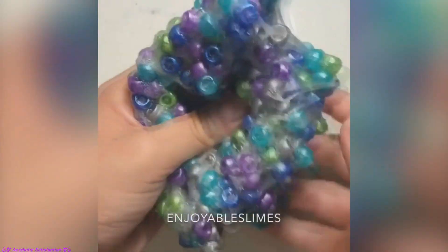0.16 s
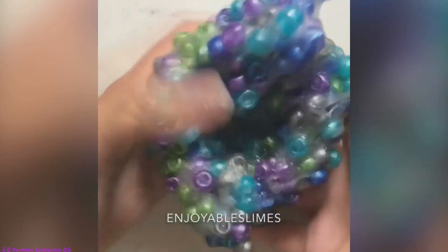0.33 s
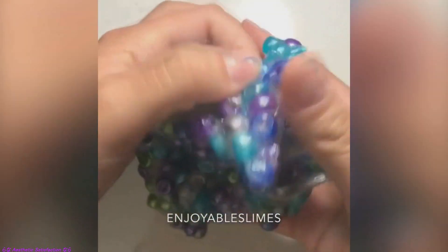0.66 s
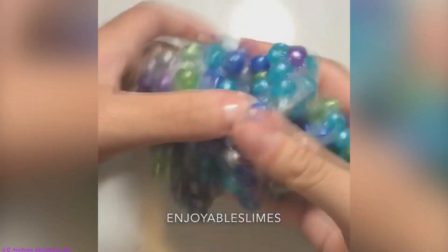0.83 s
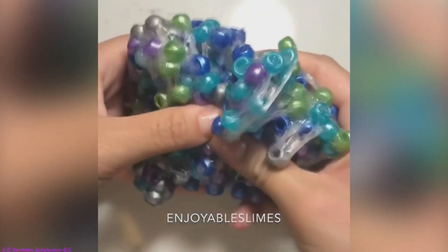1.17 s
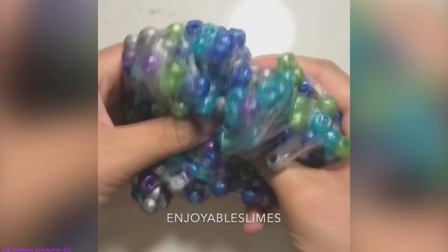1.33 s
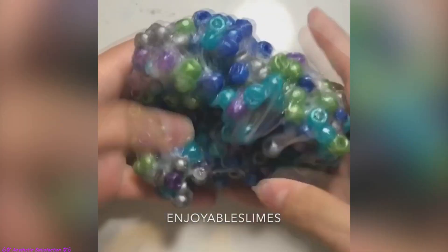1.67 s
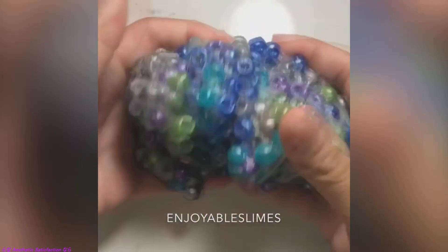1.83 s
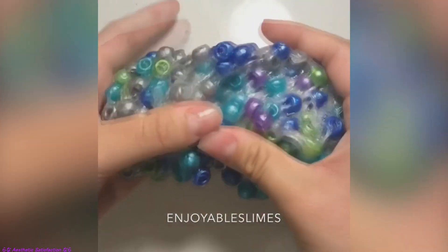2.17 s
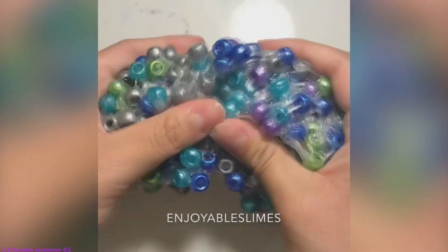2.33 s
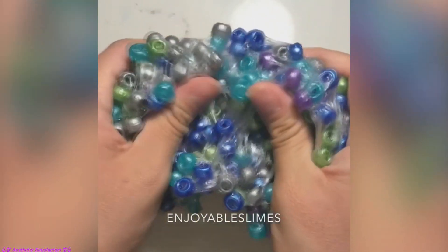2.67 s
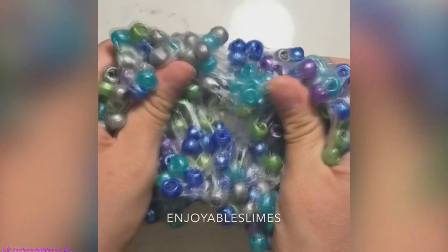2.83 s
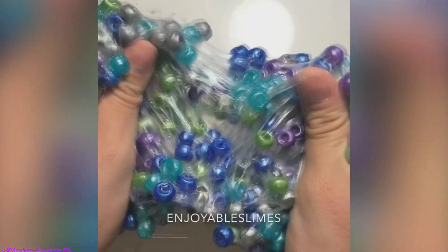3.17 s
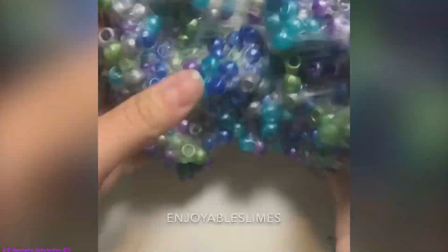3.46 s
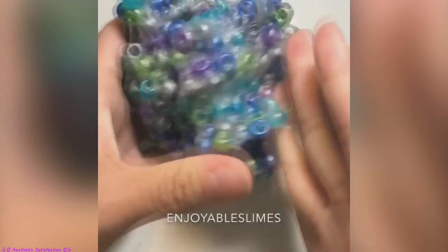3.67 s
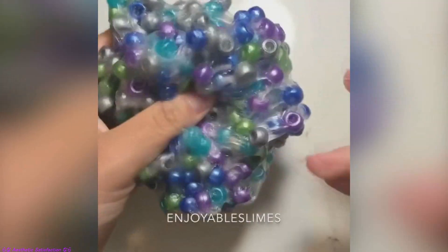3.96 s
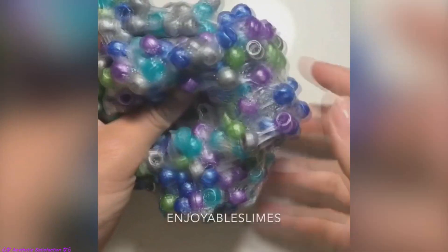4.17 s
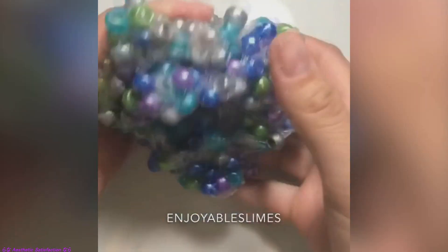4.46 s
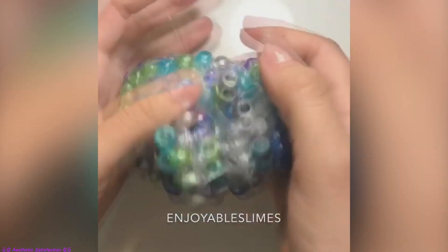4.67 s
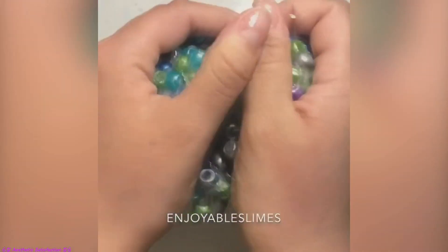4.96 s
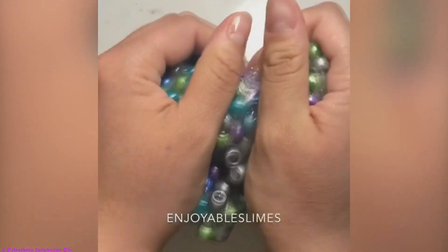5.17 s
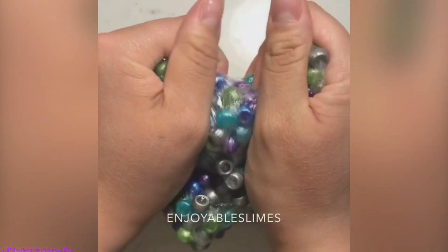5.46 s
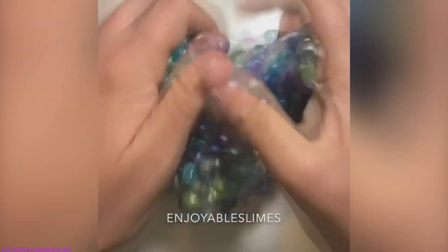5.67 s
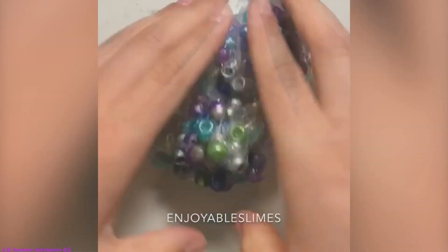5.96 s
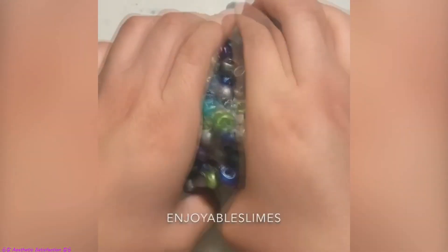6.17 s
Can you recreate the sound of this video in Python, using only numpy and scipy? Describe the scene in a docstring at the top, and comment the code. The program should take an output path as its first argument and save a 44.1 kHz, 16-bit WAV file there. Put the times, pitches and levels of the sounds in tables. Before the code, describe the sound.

Bead-filled slime crackles and pops in squeeze after squeeze, close up, with short swishes as it peels off the palms.

```python
"""Two hands knead clear slime full of plastic beads, close by in a quiet room with a low hum.
From the first squeeze, tiny sticky ruptures crackle and trapped air bursts in sharp pops.
Squeeze follows squeeze, and now and then the slime swishes as it peels off the palms.
The hardest squeeze comes at about 5.5 s; after one last peel the slime settles."""
import sys
import numpy as np
from scipy import signal
from scipy.fft import rfft, irfft, next_fast_len
from scipy.io import wavfile
from scipy.ndimage import uniform_filter1d

SR = 44100
rng = np.random.default_rng(int(sys.argv[2]) if len(sys.argv) > 2 else 0)


def wav_out(sig):
    """Save sig, one row per channel (or a flat mono array), as 16-bit PCM at SR to the path in sys.argv[1]."""
    wavfile.write(sys.argv[1], SR, np.round(np.clip(np.atleast_2d(sig).T, -1, 1) * 32767).astype(np.int16))


N = 277815

ORDINARY_DB = -48.5  # crackle drive at ordinary effort


def from_db(db):
    """Amplitude ratio: tenfold for every 20 dB."""
    return 10 ** (np.asarray(db) / 20)


def rms_one(x):
    """Normalisation to unit mean power."""
    return x / np.sqrt(np.mean(x ** 2) + 1e-20)


def level_at(spectrum, hz):
    """Interpolation of level on a logarithmic frequency axis."""
    f, db = np.transpose(spectrum)
    return np.interp(np.log(np.maximum(hz, 1)), np.log(f), db)


def coloured(x, spectrum):
    """Spectral shaping of a steady sound, at unit rms."""
    size = next_fast_len(N)
    hz = np.arange(size // 2 + 1) * SR / size
    return rms_one(irfft(rfft(x, size) * from_db(level_at(spectrum, hz)), size)[:N])


def drift(per_s):
    """Continuous random modulation of unit variance."""
    steps = rng.standard_normal(8192)
    return np.interp(np.arange(N) / SR * per_s, np.arange(len(steps)), steps) * np.sqrt(3 / 2)


def resonate(x, hz, q):
    """Two damped resonators in series: the response swells and dies within a few cycles."""
    hz = min(hz, SR / 3)
    b, a = signal.iirpeak(hz, max(q, 3 * hz / SR), fs=SR)
    return signal.lfilter(b, a, signal.lfilter(b, a, x + 1e-18))


def evened(x, window_s):
    """Running normalisation holds the short-term rms near 1."""
    power = x ** 2
    for _ in range(2):
        power = uniform_filter1d(power, max(int(window_s * SR), 2))
    return x / np.sqrt(np.abs(power) + 1e-12)


def background(hiss_db=-60, rumble_db=-51, hum_db=-53, hum_hz=57):
    """Broadband hiss and low rumble lie under a hum modulated in frequency and amplitude."""
    # noise spectra: f/Hz, relative level/dB
    hiss_spectrum = [(60, -43), (140, 4), (250, -4.5), (450, -8), (650, -8), (1900, -16), (5300, -14.5),
                     (13000, -19.5), (16000, -39)]
    rumble_spectrum = [(23, -57), (33, -0.5), (43, -43), (54, 2), (69, -0.5), (88, -16), (106, -11),
                       (130, -29), (200, -31)]
    hiss = coloured(rng.standard_normal(N), hiss_spectrum)
    rumble = coloured(rng.standard_normal(N), rumble_spectrum + [(1000, -120)])
    phase = 2 * np.pi * np.cumsum(hum_hz + 1.3 * drift(2.686)) / SR
    hum = from_db(hum_db - 0.5 * drift(7.3)) * np.sqrt(2) * np.sin(phase)
    return from_db(hiss_db) * hiss + from_db(rumble_db) * evened(rumble, window_s=0.26) + hum


def room(x, t60_s=0.17, tail_db=-21, dull_hz=7000, build_up_s=0.0027):
    """Convolution adds early reflections, sympathetic resonances and a short diffuse tail."""
    # reflections off hard surfaces around the hands: delay t/s, level/dB
    echoes = [(.0014, -26), (.0031, -48), (.0272, -55), (0.0354, -27)]
    # modes of hard things nearby: f/Hz, bandwidth/Hz, level/dB
    modes = [(1351, 28, -2), (2000, 56, -6), (3920, 28, -3.5), (5440, 100, -7), (6440, 14, -20),
             (9200, 10, -10), (8880, 146, -3.5)]
    t = np.arange(SR // 2) / SR
    tail = rng.standard_normal(len(t)) * from_db(-60 * t / t60_s) * (1 - np.exp(-t / build_up_s))
    tail = signal.sosfilt(signal.butter(1, dull_hz, fs=SR, output="sos"), tail)
    response = from_db(tail_db) * tail / np.linalg.norm(tail)
    for delay, db in echoes:
        response[int(delay * SR)] += from_db(db)
    for hz, width, db in modes:
        decay = 2 * np.pi * width / SR * np.exp(-np.pi * width * t)
        response += from_db(db) * decay * np.cos(2 * np.pi * hz * t)
    return x + signal.fftconvolve(x, response)[:N]


def ruptures(per_s, spread_db, clump_db, clumps_per_s=170):
    """Sticky threads break as a Poisson process: most faintly, the strong ones in clumps."""
    breaks = rng.random(N) < per_s / SR
    size_db = spread_db * np.minimum(rng.exponential(1, N), 4)
    size_db += clump_db * np.clip(drift(clumps_per_s), -2, 2)
    return breaks * from_db(size_db) * rng.choice([-1, 1], N)


def peeling(gain_db=-1, edge_db=-17, fade_s=0.021):
    """Shot noise: ruptures off the skin merge into a swish that follows the speed of the peel."""
    # spectrum of the swish: f/Hz, relative level/dB
    spectrum = [(150, -13.5), (400, -15.5), (700, -7.5), (1350, -7), (2400, -4.5), (5200, -7), (7500, -8.5),
                (9500, -10.5), (13000, -13.5), (16000, -10)]
    # peels, coloured by the gap under the hand: start t/s, fastest t/s, end t/s,
    # top level/dB before gain_db, ring f/Hz, ring level/dB re the swish, low-pass f/Hz
    peels = [(0.388, 0.415, .53, -39.5, 5100, -59, 12000), (1.041, 1.05, 1.11, -42, 8800, 0, 14000),
             (1.742, 1.761, 1.84, -32, 960, -13.5, 11500), (3.465, 3.502, 3.72, -30, 5800, -16, 15100),
             (4.455, 4.486, 4.502, -24.5, 5700, -10.5, 8330),
             (5.772, 5.827, 5.925, -27.5, 1340, -19, 14000)]
    swish = coloured(ruptures(per_s=14000, spread_db=5, clump_db=3.5), spectrum)
    out = np.zeros(N)
    for start, fastest, end, db, ring_hz, ring_db, muffle_hz in peels:
        span = np.arange(int((start - fade_s) * SR), int((end + fade_s) * SR))
        speed_db = np.interp(span / SR, [start, fastest, end], [edge_db, 0, edge_db])
        contact = np.interp(span / SR, [start - fade_s, start, end, end + fade_s], [0, 1, 1, 0]) ** 2
        ring = from_db(ring_db) * rms_one(resonate(swish[span], ring_hz, q=1.16))
        muffled = signal.sosfilt(signal.butter(3, muffle_hz, fs=SR, output="sos"), swish[span] + ring)
        out[span] += from_db(db + speed_db + gain_db) * contact * muffled
    return out


def kneading(grip_db_per_s=595, relax_db_per_s=143, rest_crisp_db=-61., rest_wet_db=-62.):
    """Loading and relaxation: the crisp and wet drives, in dB, rise fast and fall more slowly."""
    # squeezes: grip t/s, release t/s, crisp drive at release/dB, growth in the grip/dB, wet re crisp/dB
    squeezes = [(-.02, 0.244, -47.5, 0, -2), (0.797, 1.112, -52, 5.5, -3.5), (1.163, 1.207, -49.5, 3, -0.5),
                (1.247, 1.6, -42.5, 2, 1.5), (1.73, 1.84, -53.5, 9, 1.5), (2.027, 2.326, -48.5, 3, -3.5),
                (2.412, 2.773, -42.5, 2, -1.5), (2.792, 3.113, -41.5, 4.5, 0.5), (3.17, 3.36, -52, -8, -3),
                (3.436, 3.88, -50.5, 1, -3), (3.98, 4.1, -53.5, 2, -2), (4.114, 4.275, -44, 1, -2.5),
                (4.635, 4.781, -50, 0, -1), (4.928, 4.952, -50, 2, -1.5), (5.024, 5.23, -40, 8.5, -1.5),
                (5.258, 5.593, -31.5, 2.5, -5.5), (5.702, 5.808, -45.5, 2.5, -4.5)]
    t = np.arange(N) / SR
    crisp, wet = np.full(N, rest_crisp_db), np.full(N, rest_wet_db)
    for grip, release, db, growth_db, wet_db in squeezes:
        level = np.interp(t, [grip, release], [db - growth_db, db])
        level -= grip_db_per_s * np.maximum(grip - t, 0)
        level -= relax_db_per_s * np.maximum(t - release, 0)
        crisp, wet = np.maximum(crisp, level), np.maximum(wet, level + wet_db)
    return crisp, wet


def pockets(clicks, spectrum, q, variety_db, jostle_db, count, jostle_t60_s=0.014):
    """Impulse excitation: each rupture rings one of many pocket sizes and briefly jostles the beads."""
    pitches = np.geomspace(spectrum[0][0], spectrum[-1][0], count)
    pocket_hit = rng.integers(0, count, N)
    clicks = clicks * from_db(variety_db * np.clip(rng.standard_normal(N), -2, 2))
    fade = np.exp(-2 * np.log(1000) / (jostle_t60_s * SR))
    jostle_power = from_db(jostle_db) ** 2 * (1 - fade)
    noise, out = rng.standard_normal(N), 0
    for k, hz in enumerate(pitches):
        hits = clicks * (pocket_hit == k)
        jostle = noise * np.sqrt(signal.lfilter([jostle_power], [1, -fade], hits ** 2 + 1e-18))
        out += from_db(level_at(spectrum, hz)) / np.sqrt(hz) * resonate(hits + jostle, hz, q)
    return out


def crackle(crisp_db, wet_db, wet_gain_db=-0.65, crisp_gain_db=-1.5):
    """Acoustic emission: more stress breaks more threads, each with a wet low and a crisp high tick."""
    # spectra of the ticks: f/Hz, relative level/dB
    wet_spectrum = [(160, -17), (330, -10), (500, -20.5), (700, -1.5), (1000, 2.5), (1400, 5), (1900, 2.5),
                    (2700, 6.5)]
    crisp_spectrum = [(3100, -0.5), (4200, 3), (5500, 7), (7200, -0.5), (9000, -5), (13300, -2.5)]
    effort = from_db(0.2 * (crisp_db - ORDINARY_DB))
    clicks = ruptures(per_s=3200 * effort, spread_db=3, clump_db=4.5, clumps_per_s=240)
    wet = pockets(clicks, wet_spectrum, q=2.06, variety_db=1, jostle_db=-2, count=18)
    crisp = pockets(clicks, crisp_spectrum, q=2.3, variety_db=7, jostle_db=-2.5, count=12)
    return (from_db(wet_db + wet_gain_db) * evened(wet, window_s=0.06)
            + from_db(crisp_db + crisp_gain_db) * evened(crisp, window_s=0.023))


def pops(bursts, cavity_q=1.13, jostle_s=0.0017, size=1024):
    """Cavity resonance: a film snaps, the pocket behind it rings lower, and the beads around jostle."""
    out, t = np.zeros(N + size), np.arange(size) / SR
    click = 1. * (t == 0)
    for start, snap_db, snap_hz, snap_q, cavity_db, cavity_hz in bursts:
        at = int(start * SR)
        # a bigger pocket snaps lower and shifts more beads: 4 dB more per octave down
        jostle_db = -3 + 4 * np.log2(4670 / snap_hz)
        for db, hz, q in (snap_db, snap_hz, snap_q), (cavity_db, cavity_hz, cavity_q):
            ring = resonate(click, hz, q)
            jostle = resonate(rng.standard_normal(size) * np.exp(-t / jostle_s), hz, q)
            jostle *= from_db(jostle_db) * np.linalg.norm(ring) / np.linalg.norm(jostle)
            out[at:at + size] += from_db(db) * (ring + jostle) / np.abs(ring).max()
    return out[:N]


def small_pops(crisp_db, ordinary_per_s=45, snap_hz=7800, snap_q=1, cavity_hz=1350, spread_octaves=0.47):
    """Lesser pockets burst as a Poisson process whose rate and level rise with the squeeze."""
    effort_db = crisp_db - ORDINARY_DB
    per_s = ordinary_per_s * from_db(0.55 * effort_db)
    onsets = np.flatnonzero(rng.random(N) < per_s / SR)
    bursts = []
    for at in onsets:
        strength, pitch, cavity_pitch = np.clip(rng.standard_normal(3), -2, 2)
        snap_db = -31 + 0.65 * effort_db[at] + 3 * strength
        bursts.append((at / SR, snap_db, snap_hz * 2 ** (spread_octaves * pitch), snap_q,
                       snap_db - 13, cavity_hz * 2 ** (spread_octaves * cavity_pitch)))
    return pops(bursts)


def loud_pops():
    """Sudden pressure release: the main pockets of trapped air burst at set times."""
    # bursts: t/s, snap peak level/dB, snap f/Hz, snap Q, cavity peak level/dB, cavity f/Hz
    bursts = [(.0616, -20.5, 5500, 3.5, -44, 850), (.0764, -24, 5960, 1.9, -14.5, 2580),
              (.103, -20.5, 7200, 0.7, -31, 1510), (.121, -16.5, 5240, 1.9, -37.5, 940),
              (.2248, -16, 4200, .8, -38, 1260), (.4774, -30, 8100, 2.7, -25, 2600),
              (.7864, -26, 5360, .8, -41.5, 1190), (.8436, -24, 4200, .5, -58, 1450),
              (.8707, -32, 3630, 2.2, -48, 1410), (.9085, -23.5, 5400, .5, -53, 1700),
              (1.0352, -19.5, 2270, 1.9, -41, 1130), (1.2515, -13.5, 5000, 2.1, -17, 1340),
              (1.2762, -12, 7640, 1, -41, 1350), (1.311, -10.5, 2690, 1.1, -19, 1150),
              (1.3137, -13, 4730, 2.7, -10, 2010), (1.3705, -17.5, 7200, 2.3, -52, 1350),
              (1.3795, -23.5, 6370, 5.6, -43.5, 2150), (1.425, -13, 3570, 1, -23.5, 1100),
              (1.5145, -12.5, 4540, 1.1, -24, 1050), (1.5962, -11.5, 6200, 4.3, -20, 1690),
              (1.6114, -13.5, 5100, 1.5, -45, 1250), (1.6258, -11, 4560, 1.4, -20.5, 2590),
              (1.7245, -24.5, 5900, 1.3, -58, 1300), (1.7616, -27, 4230, .5, -32, 700),
              (1.958, -9, 4870, 1.9, -39, 920), (2.0309, -5.5, 6600, 2, -16.5, 2550),
              (2.125, -21, 8420, 1, -31.5, 1110), (2.2775, -21, 8100, 1.1, -50, 1500),
              (2.3077, -19, 2940, .4, -38.5, 1010), (2.403, -18, 3370, .9, -30, 970),
              (2.4583, -19.5, 3940, 0.6, -38, 820), (2.5175, -10, 4900, 1, -29, 1730),
              (2.5663, -19.5, 3520, .7, -25.5, 1141), (2.5917, -2, 6040, .8, -44, 1000),
              (2.6099, -8, 5770, 3, -43, 700), (2.7354, -14.5, 4500, .8, -28.5, 1160),
              (2.8986, -22, 2400, .9, -35, 1410), (2.9735, -6.5, 7560, .85, -30, 1290),
              (2.9819, -18.5, 5300, 2, -23.5, 2800), (3.0059, -23, 4540, 2.4, -18, 1350),
              (3.0199, -18.5, 5470, 2.8, -19.5, 1350), (3.0395, -14.5, 4530, 1.2, -33.5, 780),
              (3.0767, -9.5, 5470, 1, -24, 1170), (3.1296, -11, 4360, 1.3, -25, 1290),
              (3.136, -8.5, 4700, 1.6, -33, 1020), (3.1706, -22.5, 5340, 3.3, -44, 2780),
              (3.214, -5, 12500, 1.2, -27.5, 1130), (3.263, -19.5, 6640, .6, -53, 1400),
              (3.373, -26.5, 9050, 1.3, -48, 1900), (3.522, -13, 5440, 2.3, -21.5, 1690),
              (3.5294, -3.5, 5100, 1.2, -21.5, 1520), (3.566, -25, 2780, 2.7, -23, 1660),
              (3.653, -8, 6540, .7, -37.5, 750), (3.8212, -7.5, 6140, .7, -42, 696),
              (3.8479, -19, 6450, .9, -32, 1430), (4.0037, -20, 4570, .9, -30, 1740),
              (4.034, -26, 5330, 2.5, -30, 1660), (4.1232, -20, 5230, 1.2, -39, 1460),
              (4.2833, -17, 6560, 1, -36, 1290), (4.2944, -17.5, 5200, 1, -48, 700),
              (4.339, -28, 2164, 1, -33, 1150), (4.4094, -28.5, 4470, 0.9, -44.5, 1150),
              (4.4565, -10, 11900, .5, -42, 1300), (4.464, -16, 5060, 1.6, -20, 2120),
              (4.5397, -13.5, 12000, 1.1, -43.5, 1850), (4.612, -17, 6730, 1.5, -31.5, 1980),
              (4.7709, -22.5, 6900, 1.4, -50, 800), (4.8492, -23.5, 5750, .8, -47.5, 2600),
              (5.0024, -30, 2000, 1.1, -39, 820), (5.025, -19.5, 4680, 3.6, -26.5, 1570),
              (5.0755, -22.5, 2800, .5, -41, 972), (5.206, -11.5, 5000, .8, -35.5, 820),
              (5.2462, -2, 5800, .9, -27.5, 1250), (5.2592, -10.5, 5300, 1.5, -27.5, 2000),
              (5.2684, -6, 7570, .6, -49.5, 750), (5.2752, -9.5, 5000, 2, -26, 1900),
              (5.2864, -7.5, 4900, 1.6, -14, 1150), (5.3297, -8.5, 2640, .6, -18.5, 1070),
              (5.3542, -13, 8090, 4, -29, 1650), (5.3653, 2, 4470, .8, -25, 766),
              (5.4248, -9, 6800, 1.2, -49, 700), (5.4654, -11.5, 3940, .9, -35.5, 695),
              (5.4736, -12, 4300, 2.1, -18.5, 1840), (5.4906, -12.5, 3000, 0.75, -25.5, 1350),
              (5.5035, -6.5, 7660, 1.3, -20, 2200), (5.5311, -4, 6300, .7, -43, 1150),
              (5.5418, 0.5, 5700, .6, -39, 1150), (5.5497, -2.5, 7500, .8, -16, 2870),
              (5.6099, 1.5, 4850, 2, -9, 1730), (5.6442, -12.5, 2680, .9, -23.5, 1273),
              (5.732, -18.5, 6800, 1.7, -51, 1250), (6.0348, -32.5, 5000, 2.4, -58.5, 1587),
              (6.0806, -29.5, 5780, .6, -55, 1260), (6.2126, -27, 10200, 1.7, -49, 910)]
    return pops(bursts)


def scene():
    """Superposition: the slime's sounds pass through the room and add to the background."""
    crisp_db, wet_db = kneading()
    slime = loud_pops() + crackle(crisp_db, wet_db) + peeling() + small_pops(crisp_db)
    return (room(slime) + background())[None]


def record(dry, ceiling=0.95, shelf_hz=13950, shelf_db=-15, cutoff_hz=16100):
    """Soft saturation rounds the peaks; a shelf lowers the top treble and a low-pass ends it."""
    rounded = ceiling * np.tanh(dry[0] / ceiling)
    below = np.convolve(rounded, signal.firwin(161, shelf_hz, fs=SR), "same")
    shelved = below + from_db(shelf_db) * (rounded - below)
    low_pass = signal.firwin(201, cutoff_hz, window="blackman", fs=SR)
    return np.convolve(shelved, low_pass, "same")[None]


dry = scene()
out = record(dry)
wav_out(out)
```